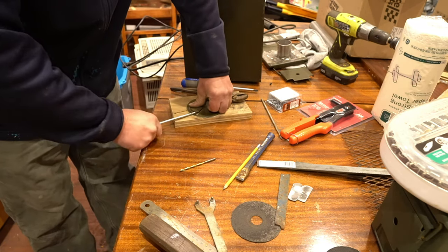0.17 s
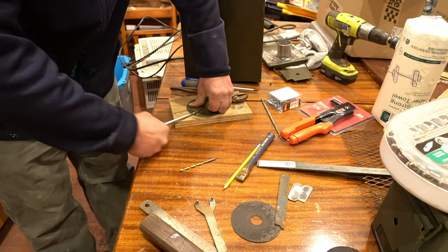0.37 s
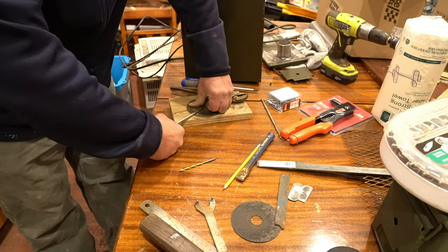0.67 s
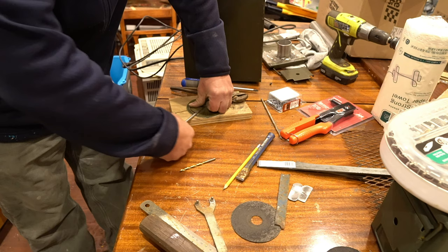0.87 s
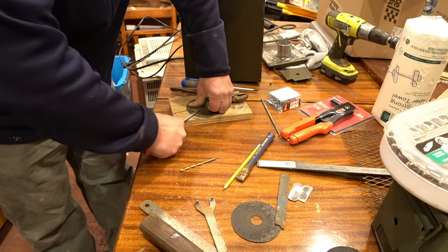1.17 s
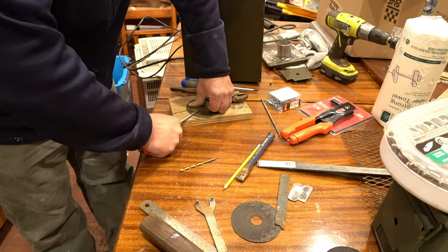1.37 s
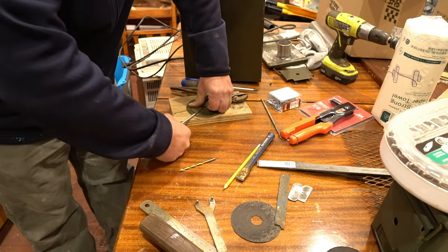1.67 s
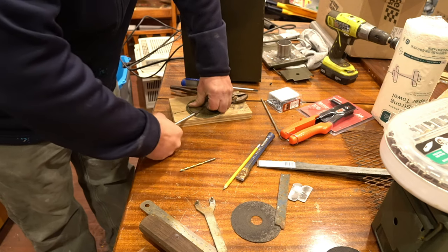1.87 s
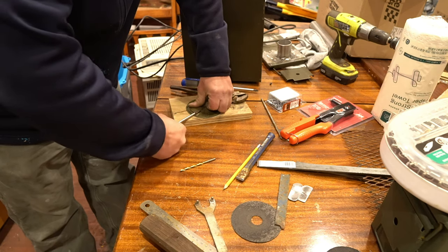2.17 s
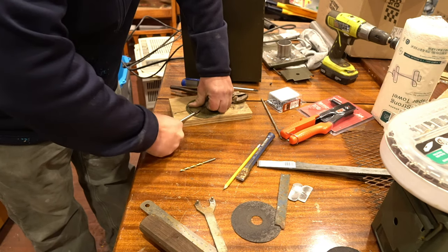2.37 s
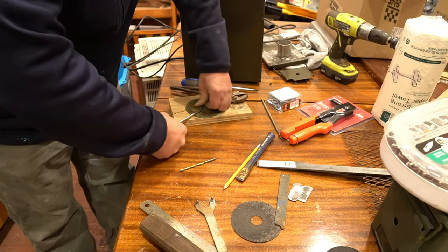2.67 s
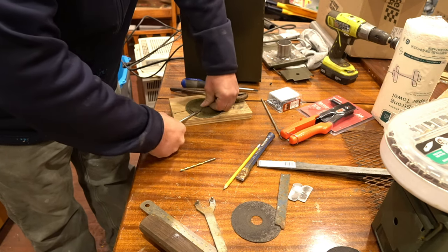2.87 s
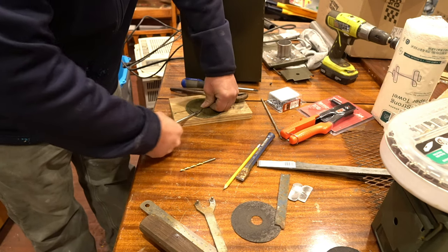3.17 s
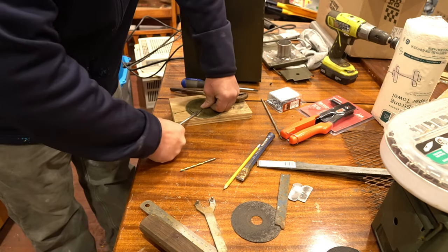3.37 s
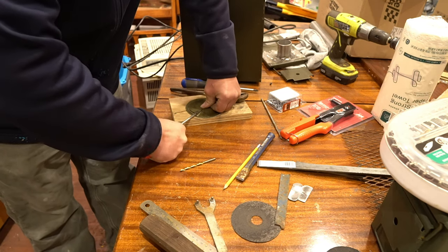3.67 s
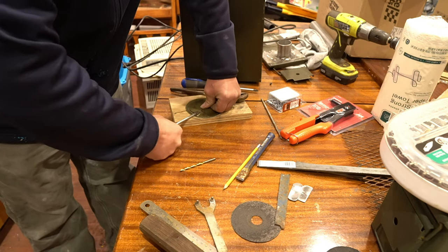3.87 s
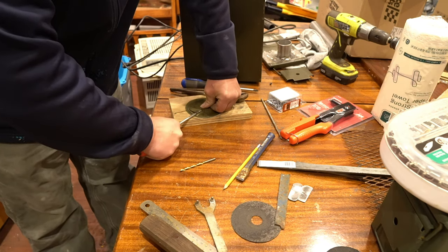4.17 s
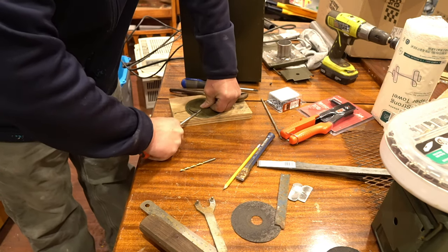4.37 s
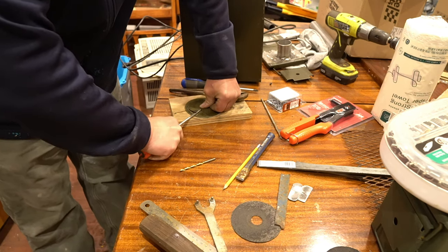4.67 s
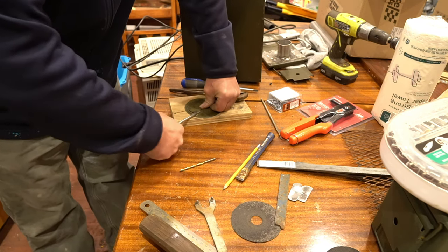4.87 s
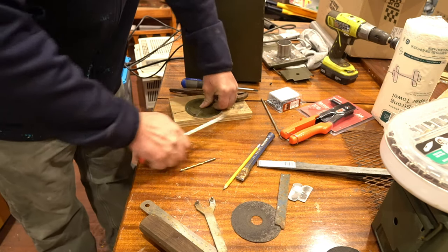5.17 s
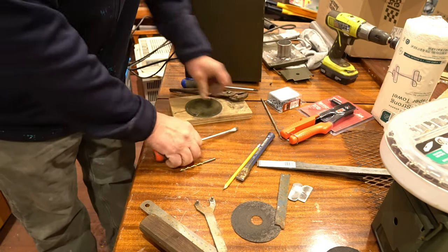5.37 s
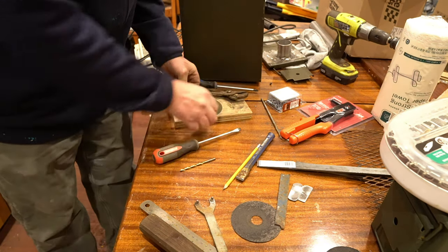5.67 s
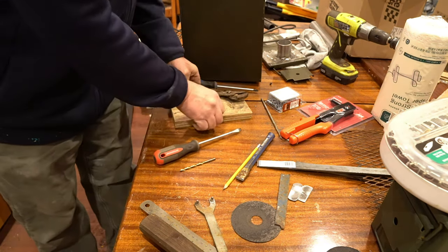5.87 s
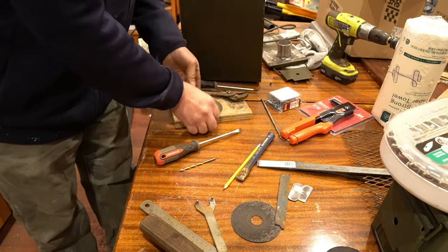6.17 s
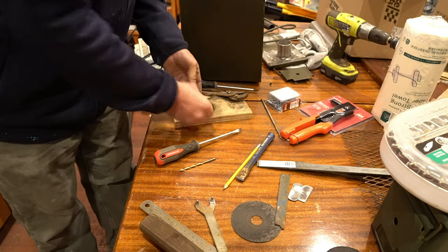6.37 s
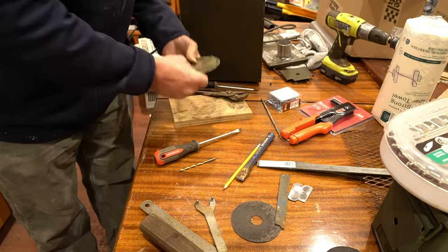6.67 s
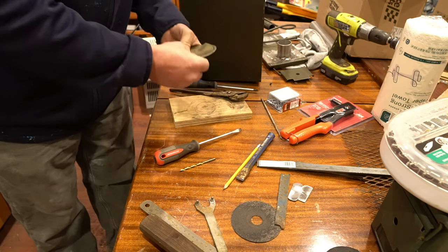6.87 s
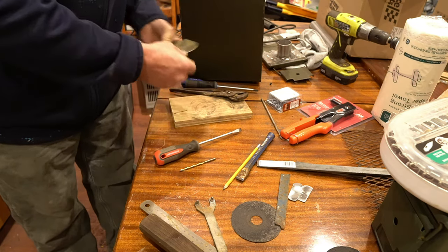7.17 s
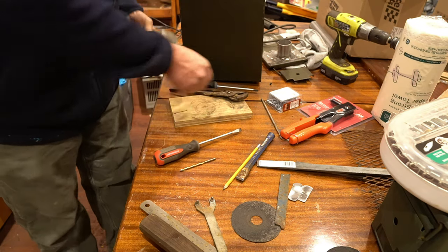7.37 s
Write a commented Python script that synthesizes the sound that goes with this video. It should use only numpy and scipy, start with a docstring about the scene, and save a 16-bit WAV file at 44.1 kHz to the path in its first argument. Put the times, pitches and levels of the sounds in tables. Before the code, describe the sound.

A small workshop with low steady rumble and a short echo, heard through one fairly close microphone. From 0.1 s, light wood knocks, a click and a grating shove at 0.5 s; thin steel scrapes and a flurry of snaps run to 1.1 s. After a lull, clicks and knocks at 1.5 and 1.9 s, a shove at 2.0 s, and gritty rasps from 2.2 s. A heavy wooden thud hits at 2.7 s. Scrapes, a small squeak and hard snaps crowd 3.0-3.5 s, with another squeak and shove at 3.7 s. A faint sleeve brush at 4 s. At 4.7-5.05 s the block grinds and groans in low judders with clicks. At 5.35 s the screwdriver lands with a sharp loud crack, chatters, bumps and rolls until 5.65 s. A knock at 5.85 s, then faint disc slides, clicks and tiny rings to 7.1 s; soft cloth at 7.4 s.

```python
"""A screwdriver pries at a steel disc held on a wooden block, on a workbench in a small workshop.
Random stick-slip impulses through steel and wood resonances make the grinding; short noise bursts make
the blade snap free of the rim, and filtered impulses make the block knock on the bench.
The dropped screwdriver clatters and its handle rolls; then the disc is slid off the block and rings
faintly in the fingers. A short echo and a steady room noise set the place."""
import sys
import numpy as np
from scipy import signal
from scipy.fft import rfft, irfft
from scipy.io import wavfile
from scipy.ndimage import uniform_filter1d

SR = 44100
rng = np.random.default_rng(int(sys.argv[2]) if len(sys.argv) > 2 else 0)


def dump_mix(stems):
    """Bounce the given channels to the path in sys.argv[1] as a 16-bit WAV at rate SR."""
    frames = np.atleast_2d(stems).T  # one column per channel
    limited = np.clip(frames, -1, 1)  # hard clip at full scale
    pcm = np.round(limited * 32767).astype(np.int16)
    wavfile.write(sys.argv[1], SR, pcm)


N = 331632
TIME = np.arange(N) / SR
RING_TIME = TIME[:SR // 2]

# Workshop background spectrum, before overall scaling: pitch_hz, relative_db
ROOM_NOISE = [(12, -33), (20, 2), (32, 2), (53, -8.5), (104, -7.5), (182, -8), (337, -13), (825, -10),
              (1290, -22.5), (4000, -38), (7000, -42.5), (16000, -46)]
ROOM_NOISE_DB = -34.5
# Workshop echo, time to die by 60 dB: pitch_hz, t60_s
ROOM_T60 = [(150,0.76),(3500,0.3),(14000,0.48)]

# Resonances of each surface, all with columns: pitch_hz, width_hz, relative_db
# The wooden bench and block
BENCH = [(99,106,-6),(218.4,36,1.5),(289,40.3,2),(385.4,69.6,1.5),(535,70,-2),(639.5,104,1),(710,143,1),(844,207,-3),(1356,640,-15.5),(2040,240,-8.5),(3120,510,-13),(4300,1200,-21)]
# The screwdriver blade
BLADE = [(1430,970,-0.5),(1834,300,12.5),(1963,560,11),(2740,930,7.5),(3065,190,10.5),(4030,820,2),(5430,1360,-3.5)]
# The sharp edge biting
GRIT = [(6030,860,0.5),(7850,1300,0),(9370,990,0.5),(12250,2600,0.83),(13500,1960,0.48)]
# The clamped rim of the disc
RIM = [(1216,21,-16),(1985,91,-4),(2360,120,0.5),(3006,340,-0.5),(4060,234,-0.5),(4710,1040,-8)]
# The dropped steel shaft
SHAFT = [(790,207,13),(1036,390,7),(1680,170,1.5),(2125,164,7),(3060,320,0),(4960,470,-17)]
# Modes of the free disc: pitch_hz, relative_db
DISC = [(1723,4.5),(2223,5),(2676,7.5),(3548,3.5),(4317,-2),(5130,4),(7612,-6),(8950,-8),(10200,-5.5),(11900,-7)]
DISC_RING_CYCLES = 255  # each mode dies by 60 dB in this many cycles

# Steel slides on steel or wood and its edge bites: start_s, end_s, steel_grind_db, edge_grit_db
RASPS = [(0.24, 0.417, -45.5, -52), (0.685, 1.12, -40.5, -50), (1.683, 1.765, -34, -44.5),
         (2.232, 2.457, -41.5, -48.5), (2.576, 2.658, -35, -42.5), (2.703, 2.763, -28, -48),
         (2.901, 2.97, -41.5, -45), (3.04, 3.246, -37, -41.5), (3.27, 3.524, -39, -69),
         (3.696, 3.75, -31.5, -42.5), (4.787, 4.947, -38, -35), (5.0, 5.248, -37.5, -56)]
RASP_ATTACK_S, RASP_RELEASE_S = 0.0072, 0.018
RASP_EASE = 0.16  # share of a stroke's length added to the attack and release of its grind
HANDLING_DB = -51.5  # the hands never hold the steel quite still
WOOD_UNDER_STEEL_DB = 4.5  # wood rumble relative to the steel grind of the rasps and handling
# The blade shoves the block along the bench: start_s, end_s, wood_rumble_db, steel_grind_db
SHOVES = [(0.502, 0.552, -15.5, -23), (1.488, 1.491, -19.5, -33.5), (1.76, 1.809, -25, -34.5),
          (2.002, 2.023, -18, -23.5), (3.087, 3.206, -18.5, -29), (3.737, 3.765, -21.5, -37),
          (4.72, 4.79, -21, -31), (4.873, 4.95, -13, -19.5), (4.957, 5.056, -13.5, -46)]
SHOVE_ATTACK_S, WOOD_RELEASE_S, STEEL_RELEASE_S = 0.031, 0.031, 0.0095
# Block or handle hits the bench: start_s, level_db, contact_hardness_hz
KNOCKS = [(0.131, -20, 400), (0.143, -10, 1560), (1.467, -20.5, 1100), (1.942, -10, 1550), (2.705, 1, 990),
          (2.713, -22, 2190), (2.744, -3.5, 604), (3.3985, -8.5, 3020), (3.7, -19.5, 3700),
          (4.657, -19, 740), (4.692, -14.5, 650), (4.895, -6.5, 1320), (5.438, -3, 714), (5.476, -8, 900),
          (5.565, -7, 860), (5.611, -13.5, 750), (5.639, -11.5, 800), (5.855, -5.5, 790)]
# Blade or disc slips off an edge: start_s, level_db, treble_against_rim_db
SNAPS = [(0.2461, -17.5, -4), (0.553, -12, -10), (0.6695, -24, -5), (0.7659, -14.5, -21), (0.8391, -15, -4),
         (0.943, -18, -19), (0.9804, -12.5, -9), (0.9933, -13.5, -11), (1.002, -15.5, -9),
         (1.047, -21.5, 5), (1.4585, -17.5, -0.5), (1.698, -24.5, -6), (2.2057, -19, -18),
         (2.246, -18.5, -11), (2.257, -18, 0), (2.2627, -18.5, -3), (2.996, -23.5, 5), (3.023, -15, -1),
         (3.1523, -9, -14), (3.283, -4.5, -2), (3.3045, -9, -3), (3.7372, -19, -11), (3.775, -25, -1),
         (4.6765, -30, 8), (4.783, -15, -8), (4.7943, -20, -1), (4.8152, -17.5, -5), (4.867, -22, 6),
         (4.9677, -9, -6), (5.7283, -30, -15), (5.7843, -32.5, -23), (5.8735, -18, -11), (6.168, -17, -19),
         (6.263, -22.5, -11), (6.4923, -29.5, -20)]
# The blade squeaks as it slides off: start_s, pitch_hz, level_db
SQUEAKS = [(3.155,2730,-19),(3.698,1886,-21)]
# A sleeve brushes along: start_s, end_s, level_db
BRUSHES = [(3.984, 4.256, -41), (7.365, 7.516, -39)]

# The block judders under load: start_s, end_s, starting_pitch_hz, level_db
JUDDER = [(4.732, 4.746, 288, -16), (4.901, 4.92, 392, -15.5), (5.005, 5.039, 285, -13)]
JUDDER_ATTACK_S, JUDDER_RELEASE_S = 0.015, 0.037
JUDDER_SAG, JUDDER_SAG_S = 0.257, 0.1037  # the slips slow by this share over this time

# The dropped shaft strikes, a single event: start_s, level_db
DROP = (5.3452, 0.31)
# The shaft then chatters until it lies flat
CHATTER_FULL_S, CHATTER_END_S, CHATTER_DB = 5.38, 5.435, -14
CHATTER_ATTACK_S, CHATTER_RELEASE_S = 0.024, 0.015
# The handle rocks, then rolls to rest: start_s, end_s, level_db, dying_time_s
ROLL = [(5.463, 5.64, -10.5, 0.05), (5.848, 5.894, -20.5, 0.26)]
ROLL_ATTACK_S = 0.046

# The disc slides off the block and through the fingers: start_s, end_s, relative_db
DISC_SLIDE = [(5.824, 5.895, -33), (5.993, 6.142, -36), (6.156, 6.168, -29), (6.26, 6.348, -45.5),
              (6.498, 6.51, -37.5), (6.577, 6.599, -36.5), (6.69, 6.759, -38.5), (7.086, 7.126, -41.5)]
# The free disc is touched: start_s, relative_db, favoured_mode_hz
TOUCHES = [(6.263, -40.5, 5130), (6.322, -39.5, 2223), (6.366, -41, 2223), (6.493, -50, 2676)]


def from_db(db):
    """Decibels to gain."""
    return 10 ** (np.asarray(db) / 20)


def rms_one(x):
    """Scale to rms 1."""
    return x / np.sqrt(np.mean(x ** 2) + 1e-20)


def unit_energy(x):
    """Scale to a sum of squares of 1."""
    return x / np.sqrt(np.sum(x ** 2) + 1e-20)


def at_level(sound, db, length_s):
    """Give a hit the energy of a level held for length_s."""
    return unit_energy(sound) * from_db(db) * np.sqrt(length_s * SR)


def at_hz(points, hz):
    """Read a table on a log-frequency axis."""
    table_hz, value = np.transpose(points)
    return np.interp(np.log(hz + 1e-9), np.log(table_hz), value)


def cut(x, hz, kind, order=2):
    """Butterworth filter."""
    sos = signal.butter(order, np.clip(hz, 10, 0.45 * SR), kind, fs=SR, output="sos")
    return signal.sosfilt(sos, x)


def add(out, s, sound):
    """Mix a sound in at time s."""
    i = int(s * SR)
    out[i:i + len(sound)] += sound[:N - i]


def through(x, response):
    """Pass a signal through an impulse response."""
    return signal.fftconvolve(x, response)[:len(x)]


def body(modes):
    """Impulse response of damped resonances of alternating sign; wider ones die sooner."""
    response = 0
    for k, (hz, width, db) in enumerate(modes):
        decay = np.exp(-np.pi * width * RING_TIME)
        ring = decay * np.cos(2 * np.pi * hz * RING_TIME)
        response = response + (-1) ** k * from_db(db) * width * ring
    return unit_energy(response)


def drift(per_s):
    """Smooth random wander of rms 1."""
    knots = rng.standard_normal(int(N / SR * per_s) + 2)
    return rms_one(np.interp(TIME * per_s, np.arange(len(knots)), knots))


def slips(per_s, spread_db):
    """Stick-slip: random tiny impulses of uneven size."""
    sizes_db = spread_db * np.clip(rng.standard_normal(N), -2, 2)
    impulses = from_db(sizes_db) * rng.choice([-1, 1], N)
    return impulses * (rng.random(N) < per_s / SR)


def burst(rise_s):
    """A quick swell of micro-slips as one contact lets go."""
    t = RING_TIME[:SR // 10] / rise_s
    return rng.standard_normal(len(t)) * t * np.exp(-t)


def steady(x, window_s=0.28):
    """Hold the slow level near rms 1 and keep the grain."""
    power = uniform_filter1d(x ** 2, int(window_s * SR) + 1)
    return x / np.sqrt(np.abs(power) + np.mean(x ** 2) / 100)


def swell(start, end, attack_s, release_s):
    """Exponential attack up to start, hold at 1 until end, exponential release."""
    before = np.maximum(start - TIME, 0) / attack_s
    after = np.maximum(TIME - end, 0) / release_s
    return np.exp(-np.minimum(before + after, 20))


def background():
    """Steady low rumble and hiss of the room: noise shaped by a fixed spectrum."""
    hz = np.arange(N // 2 + 1) * SR / N
    spectrum = rfft(rng.standard_normal(N)) * from_db(at_hz(ROOM_NOISE, hz))
    return from_db(ROOM_NOISE_DB) * rms_one(irfft(spectrum, N))


def stroke_levels():
    """Gains of wood rumble, steel grind and edge grit; the powers of all strokes add up."""
    steel, edge = from_db(HANDLING_DB) ** 2, 0
    for start, end, steel_db, edge_db in RASPS:
        ease_s = RASP_EASE * (end - start)
        grind = swell(start, end, RASP_ATTACK_S + ease_s, RASP_RELEASE_S + ease_s)
        bite = swell(start, end, RASP_ATTACK_S, RASP_RELEASE_S)
        steel = steel + (from_db(steel_db) * grind) ** 2
        edge = edge + (from_db(edge_db) * bite) ** 2
    wood = steel * from_db(WOOD_UNDER_STEEL_DB) ** 2
    for start, end, wood_db, steel_db in SHOVES:
        rumble = swell(start, end, SHOVE_ATTACK_S, WOOD_RELEASE_S)
        grind = swell(start, end, SHOVE_ATTACK_S, STEEL_RELEASE_S)
        wood = wood + (from_db(wood_db) * rumble) ** 2
        steel = steel + (from_db(steel_db) * grind) ** 2
    return np.sqrt([wood, steel, edge])


def rubbed(force, modes, patchy_db=2, shifts_per_s=40):
    """As the contact point travels, each resonance swells and fades on its own."""
    total = 0
    for k, (hz, width, db) in enumerate(modes):
        ring = through(force, body([(hz, width, db)])[:SR // 10])
        gain = from_db(db + patchy_db * drift(shifts_per_s))
        total = total + (-1) ** k * ring * np.sqrt(width) * gain
    return steady(total)


def scraping(grit_db=-19):
    """One stuttering stream of slips shakes wood and blade; coarser grains crackle where the edge bites."""
    wood_gain, steel_gain, bite = stroke_levels()
    stutter = from_db(4 * drift(220))
    friction = slips(per_s=2600, spread_db=3.0) * stutter
    grains = slips(per_s=110, spread_db=5.0) + 0.39 * friction
    rumble = steady(through(cut(friction, 438, "high", order=3), body(BENCH)))
    wood = cut(wood_gain * rumble, 1024, "low")
    grind = steel_gain * rubbed(cut(friction + grains, 12000, "low"), BLADE)
    # some grit goes along with every grind, besides the bites
    grit_gain = np.hypot(steel_gain * from_db(grit_db), bite)
    grit = grit_gain * rubbed(cut(grains, 4900, "high"), GRIT)
    return wood + grind + grit


def knocks(rattle_s=0.051, crack_db=-13):
    """A harder contact gives a brighter thud and a stronger crack; the wood rattles briefly after each."""
    out, bench, blade = np.zeros(N), body(BENCH), body(BLADE)
    for s, db, hardness_hz in KNOCKS:
        rattle = slips(per_s=900, spread_db=6)[:len(bench)] * np.exp(-RING_TIME / rattle_s)
        force = from_db(-23) * rattle
        force[0] += 1  # the blow itself
        force = cut(force, hardness_hz, "low")
        force = cut(force, hardness_hz / 6, "high", order=1)
        add(out, s, at_level(through(force, bench), db, 0.0039))
        crack = at_level(through(burst(0.00026), blade), db + crack_db, 0.0036)
        add(out, s, crack * min(hardness_hz / 1500, 1) ** 2)
    return cut(out, 5200, "low", order=6)


def ticks(level_db=8, rim_db=2):
    """Burrs catch and let go in random flurries while the edge bites."""
    bite = stroke_levels()[2]
    bite_gain = np.sqrt(bite * from_db(-50))  # evens out light and heavy bites
    flurries = from_db(2.5 * drift(15))
    force = slips(per_s=70, spread_db=4) * bite_gain * flurries
    catches = through(force, unit_energy(burst(0.00014)))
    grit = through(cut(catches, 4000, "high"), body(GRIT))
    rim = from_db(rim_db) * through(catches, body(RIM))
    return from_db(level_db) * (grit + rim)


def snaps(crack_s=0.00061, rise_s=0.00041, ring_db=-24, ring_s=0.01, flex_db=-12, detune=0.049):
    """The edge cracks free; the clamped rim rings at a pitch set by the grip, and the blade flexes."""
    out, grit, blade = np.zeros(N), body(GRIT), body(BLADE)
    for s, db, treble_db in SNAPS:
        grip = np.exp(detune * rng.uniform(-1.04, 1))
        rim = body([(hz * grip, width, mode_db) for hz, width, mode_db in RIM])
        release = burst(rise_s * rng.uniform(1, 3.7))
        t = RING_TIME[:len(release)]
        # dying noise stands for many close partials
        ring = from_db(ring_db) * np.exp(-t / ring_s) * rng.standard_normal(len(t))
        click = unit_energy(through(release + ring, rim))
        crack = through(cut(burst(crack_s), 4000, "high"), grit)
        flex = through(cut(release, 980, "low"), blade)
        click += from_db(treble_db) * unit_energy(crack)
        click += from_db(flex_db) * unit_energy(flex)
        add(out, s, at_level(click, db, 0.0028))
    return out


def squeaks(fade_s=0.0086, width_hz=80):
    """A dying run of slips drives one narrow resonance of the steel."""
    out = np.zeros(N)
    for s, hz, db in SQUEAKS:
        fade = np.exp(-RING_TIME / fade_s)
        force = slips(per_s=2300, spread_db=5)[:len(RING_TIME)] * fade
        add(out, s, at_level(through(force, body([(hz, width_hz, 0)])), db, 0.02))
    return out


def sleeve(low_hz=1100, high_hz=4200, ease_s=0.12):
    """Cloth brushes along with a soft, even hiss of band-limited noise as the arms move."""
    hiss = cut(rng.standard_normal(N), [low_hz, high_hz], "band")
    hiss = rms_one(cut(hiss, low_hz, "low", order=1))
    return hiss * sum(from_db(db) * swell(start, end, ease_s, ease_s) for start, end, db in BRUSHES)


def judder(waver=0.0708, flutter_db=3, overtone_db=-10):
    """The loaded block creeps in uneven, nearly periodic slips that slow down as it gives way."""
    out = 0
    wander = 1 + waver * drift(150)
    flutter = from_db(flutter_db * drift(90))
    overtones = from_db(overtone_db + flutter_db * drift(90))
    for start, end, hz, db in JUDDER:
        slowing = 1 - JUDDER_SAG * np.clip((TIME - start) / JUDDER_SAG_S, 0, 1)
        phase = 2 * np.pi * np.cumsum(hz * slowing * wander) / SR
        groan = np.sin(phase) + overtones * (np.sin(2 * phase) + np.sin(3 * phase))
        out = out + from_db(db) * swell(start, end, JUDDER_ATTACK_S, JUDDER_RELEASE_S) * groan
    return flutter * out


def dropped_screwdriver(crack_db=-16):
    """The steel shaft lands with a crack and buzzes against the wood; the handle rolls in uneven bumps."""
    shaft = body(SHAFT)
    s, strike_db = DROP
    chatter = swell(CHATTER_FULL_S, CHATTER_END_S, CHATTER_ATTACK_S, CHATTER_RELEASE_S)
    chatter = (TIME > s) * from_db(CHATTER_DB) * chatter  # silent before the landing
    out = chatter * steady(through(slips(per_s=630, spread_db=2.5), shaft))
    strike = cut(through(burst(0.0005), shaft), 1600, "high", order=4)
    add(out, s, at_level(strike, strike_db, 0.005))
    out = cut(out, 5200, "low", order=8)
    add(out, s, at_level(cut(burst(0.00048), 3000, "high"), crack_db, 0.0014))
    bumps = cut(slips(per_s=300, spread_db=1.5), [230, 760], "band")
    rumble = steady(through(bumps, body(BENCH)))
    rumble *= rms_one(from_db(4 * drift(55)))
    roll = sum(from_db(db) * swell(start, end, ROLL_ATTACK_S, dying_s)
               for start, end, db, dying_s in ROLL)
    return out + rumble * roll


def disc_modes():
    """The ring of each mode of the free disc, one row each; higher modes die sooner."""
    rings = []
    for hz, db in DISC:
        fading_db = db - 60 * RING_TIME * hz / DISC_RING_CYCLES
        rings.append(from_db(fading_db) * np.sin(2 * np.pi * hz * RING_TIME))
    return np.array(rings)


def free_disc(rub_db=-2, low_hz=1600, high_hz=1500):
    """The unclamped disc hisses and jingles as it slides, its modes shifting; a touch favours one mode."""
    modes = disc_modes()
    friction = slips(per_s=1500, spread_db=1.5)
    hiss = steady(cut(cut(friction, low_hz, "high"), high_hz, "low", order=1))
    jingle = steady(sum(through(friction, ring[:SR // 4]) * from_db(5 * drift(25)) for ring in modes))
    stroke = sum(from_db(db) * swell(start, end, RASP_ATTACK_S, RASP_RELEASE_S)
                 for start, end, db in DISC_SLIDE)
    out = from_db(rub_db) * stroke * (hiss + jingle)
    mode_hz = np.array(DISC)[:, 0]
    for s, db, favoured_hz in TOUCHES:
        favour_db = 9 * (np.abs(np.log(mode_hz / favoured_hz)) < 0.08)
        add(out, s, from_db(db + favour_db) @ modes)
    return out


def workshop(x, wet_db=-6, dull_hz=5500, build_s=0.0012):
    """Room echo: a diffuse noise tail builds up quickly and dies at its own rate in each band."""
    t, tail = RING_TIME, 0
    edges = np.geomspace(70, 18000, 9)
    for low, high in zip(edges, edges[1:]):
        band = cut(rng.standard_normal(len(t)), [low, high], "band")
        t60_s = at_hz(ROOM_T60, np.sqrt(low * high))
        tail = tail + band * from_db(-60 * t / t60_s)
    tail = unit_energy(tail * (1 - np.exp(-(t / build_s) ** 2)))
    return x + from_db(wet_db) * through(x, cut(tail, dull_hz, "low"))


def scene():
    """All the work on the bench, heard in the room through one microphone channel."""
    prying = scraping() + ticks() + snaps() + squeaks() + judder()
    work = prying + knocks() + dropped_screwdriver() + free_disc() + sleeve()
    return (workshop(work) + background())[None]


def record(dry):
    """The loudest peaks overload and are rounded off; the top of the treble is cut steeply."""
    clipped = dry / (1 + dry ** 6) ** (1 / 6)
    lowpass = signal.ellip(10, 0.1, 70, 15900, fs=SR, output="sos")  # ripple dB, stopband dB, cutoff Hz
    return signal.sosfilt(lowpass, clipped)


dry = scene()
out = record(dry)
dump_mix(out)
```